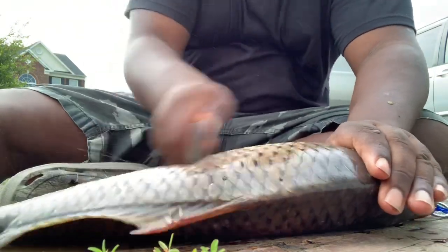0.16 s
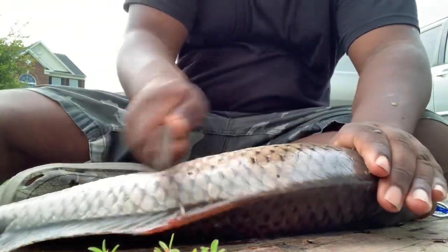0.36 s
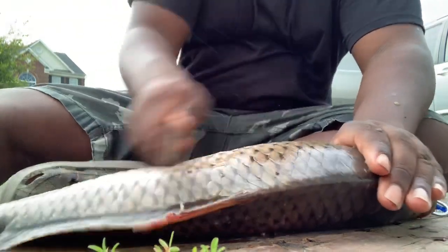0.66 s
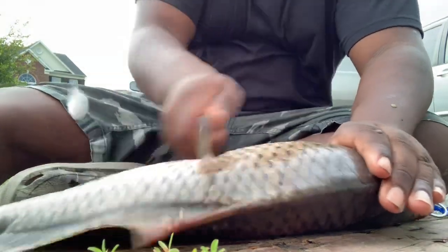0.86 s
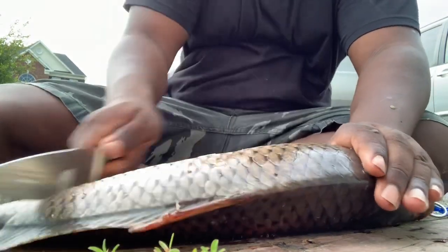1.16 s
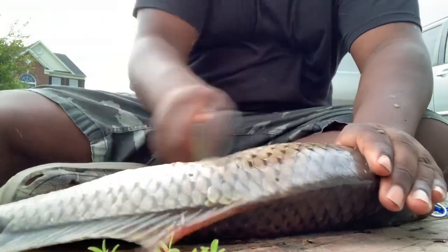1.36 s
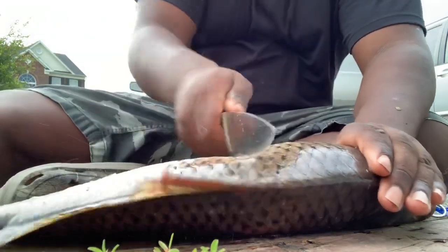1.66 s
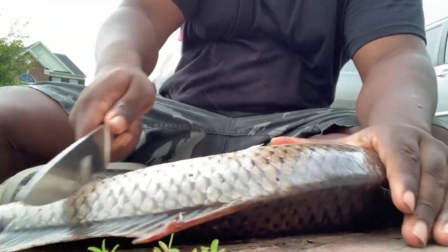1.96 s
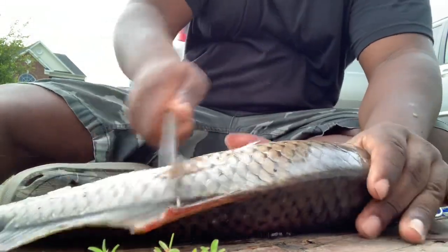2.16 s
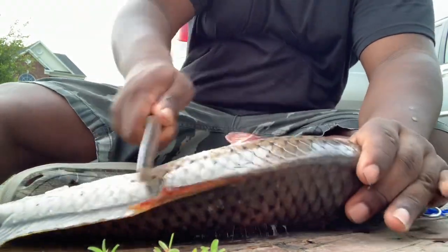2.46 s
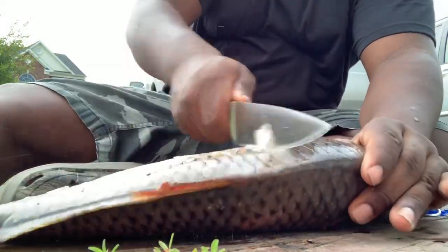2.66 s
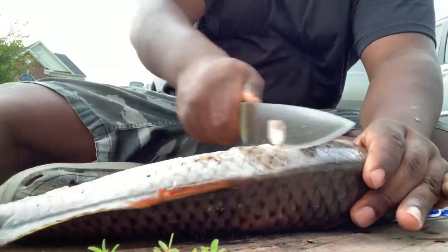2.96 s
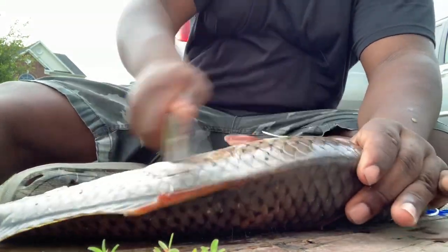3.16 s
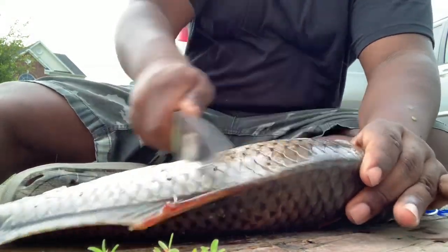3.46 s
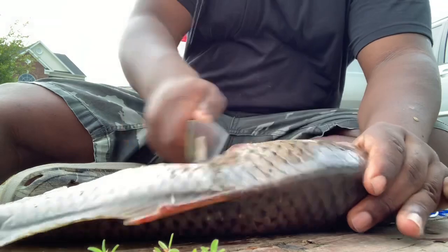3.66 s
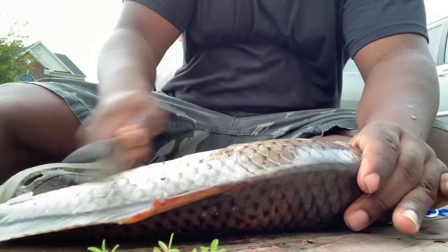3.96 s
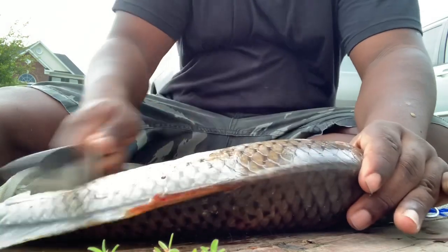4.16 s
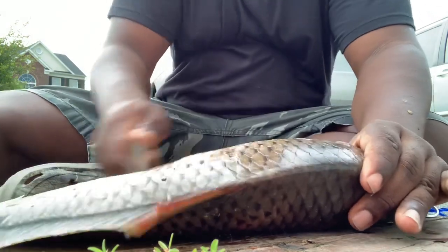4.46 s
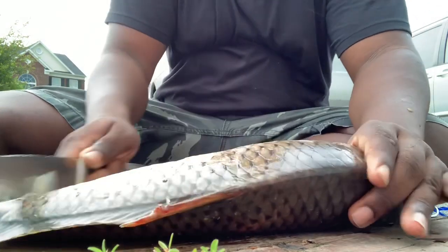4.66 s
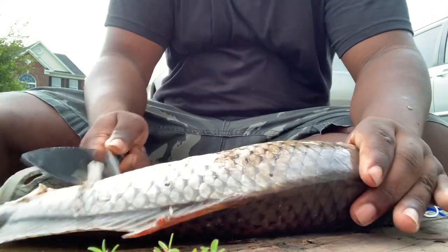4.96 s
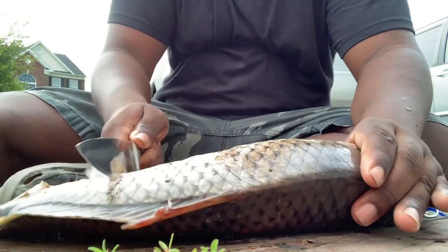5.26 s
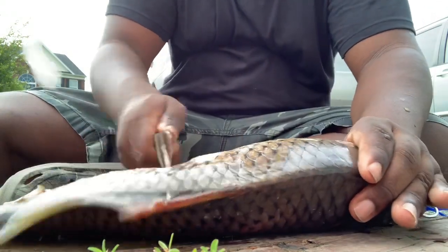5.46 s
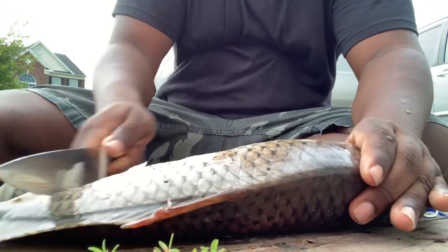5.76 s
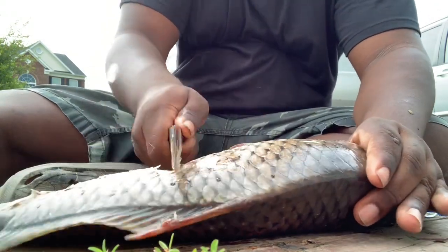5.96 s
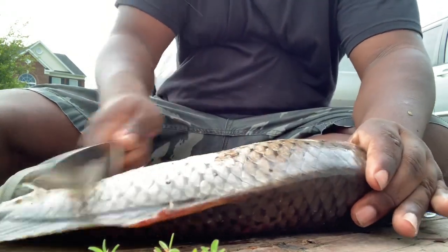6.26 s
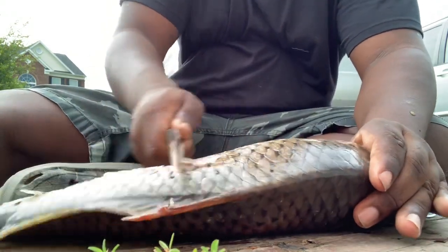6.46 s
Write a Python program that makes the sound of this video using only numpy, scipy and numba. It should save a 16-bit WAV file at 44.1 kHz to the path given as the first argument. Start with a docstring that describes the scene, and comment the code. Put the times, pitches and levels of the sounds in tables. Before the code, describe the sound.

Close to a phone on the ground outdoors, a kitchen knife scales a large fish on a board. A short smooth draw opens at 0 s, then from 0.15 s rough pushes alternate with hissing draws, about three pairs a second. The pushes are bright, gritty and tearing, with dry snaps as scales break loose, strongest around 0.55 to 1.7 s; the draws are smoother, with a hollow, slightly rising ring. Soft, damped low flops follow many pushes, rocking the board. The pattern continues until about 4.1 s, then thins to light scrapes, ticks of falling scales and weak thumps until 5.3 s. Firmer strokes return around 5.4 s, with two close flops near 6.4 s and a last draw at 6.55 s. A faint whine drifts in from 2 to nearly 5 s above low hum and distant traffic.

```python
"""Outdoors, a phone on the ground hears, close by, a kitchen knife scaling a large fish on a board.
A smooth draw opens; then pushes that catch and snap scales loose alternate with hissing draws, both made
of noise-like slips through filters. Soft flops, damped low tones, follow many pushes and rock the board.
A faint whine comes and goes from the second second to the fifth, as the strokes thin out; they then
return, with two last flops and a draw. A low hum and distant traffic lie under it all."""
import sys
import numpy as np
from scipy import signal
from scipy.fft import rfft, irfft
from scipy.io import wavfile
from scipy.ndimage import uniform_filter1d, map_coordinates
from numba import njit

SR = 44100
rng = np.random.default_rng(int(sys.argv[2]) if len(sys.argv) > 2 else 0)


def unload_wav(signal):
    """Save mono or channel-first audio to the path in sys.argv[1] as 16-bit WAV at rate SR, clipped to [-1, 1]."""
    wavfile.write(
        sys.argv[1],
        SR,
        np.round(np.clip(np.atleast_2d(signal).T, -1, 1) * 32767).astype(np.int16),
    )


N = 291942
TIME = np.arange(N) / SR

# Event levels are relative: each source adds its own layer gain.
# pushes against the scales: [start t/s, length t/s, fastest point/share of length, swell/dB,
# rasp level/dB, flesh scrape level/dB]
PUSHES = [(0.147, 0.12, 0.1, 12.5, -18, -31), (0.485, 0.12, 0.13, 26.5, -19.5, -31),
          (0.817, 0.085, 0.19, 14.5, -20, -28.5), (0.91, 0.054, 0.19, 6.5, -39, -37.5),
          (1.217, 0.1, 0.59, 7, -25.5, -36.5), (1.571, 0.14, 0.3, 16.5, -20, -26),
          (2.149, 0.17, 0.058, 25.5, -24, -28), (2.514, 0.1, 0.74, 7, -31, -38),
          (2.622, 0.034, 0.47, 18, -35, -50), (2.865, 0.086, 0.14, 11.5, -23.5, -37),
          (3.195, 0.14, 0.66, 15.5, -21.5, -32), (3.64, 0.16, 0.25, 22.5, -29.5, -36),
          (3.971, 0.11, 0.67, 15.5, -24, -35.5), (4.972, 0.034, 0.88, 10, -25.5, -40),
          (5.173, 0.13, 0.83, 9, -41, -50), (5.398, 0.078, 1, 12, -42, -51),
          (5.459, 0.054, 0.25, 19, -28.5, -35.5), (5.811, 0.06, 0.91, 11, -21.5, -33.5),
          (5.88, 0.094, 0.22, 19.5, -32, -31), (6.274, 0.11, 0.44, 18.5, -28.5, -30),
          (6.358, 0.083, 0.26, 7.5, -35.5, -38)]
# draws back along the scales: [start t/s, length t/s, fastest point/share of length, swell/dB,
# rasp level/dB, flesh scrape level/dB, hollow crackle level/dB]
DRAWS = [(0.001, 0.1, 1, 4, -36.5, -34.5, -39.5), (0.33, 0.12, 0.79, 9.5, -27, -32, -25.5),
         (0.642, 0.019, 0.55, 14, -24.5, -35, -35), (0.669, 0.1, 0.76, 7, -20.5, -30, -23.5),
         (1.016, 0.13, 0.59, 10, -21.5, -27.5, -19.5), (1.377, 0.079, 0.21, 18, -24, -34.5, -28.5),
         (1.448, 0.081, 0.46, 3, -27, -31, -33.5), (1.77, 0.14, 0.3, 5.5, -27, -29, -27.5),
         (1.968, 0.16, 0.055, 0, -45, -43, -51), (2.398, 0.083, 0.34, 11, -28, -31.5, -27),
         (2.729, 0.088, 0.2, 8, -31.5, -32.5, -36.5), (3.032, 0.12, 0.32, 16.5, -27.5, -28.5, -32.5),
         (3.378, 0.081, 0.46, 12.5, -22, -30.5, -34), (3.485, 0.036, 0.09, 1.5, -32, -30, -39.5),
         (3.549, 0.046, 0.12, 8, -34, -33, -33.5), (3.787, 0.14, 0.25, 19, -30.5, -33.5, -32),
         (4.109, 0.15, 0.65, 14.5, -29.5, -29.5, -31.5), (4.307, 0.119, 0.5, 3.5, -38, -38, -37.5),
         (4.461, 0.15, 1, 3, -42.5, -48, -45), (4.675, 0.069, 0.67, 17.5, -31, -32.5, -27.5),
         (4.781, 0.11, 0.71, 16, -55.5, -64, -47.5), (5.559, 0.1, 0.19, 3.5, -34.5, -35, -36.5),
         (5.679, 0.082, 0.65, 16, -34, -35, -42), (6.045, 0.13, 1, 1, -55, -63, -51.5),
         (6.123, 0.11, 0.35, -3.5, -38, -44, -39), (6.542, 0.097, 0.53, 30, -22, -33, -28.5)]
# the edge gets under a scale and peels it off: [start t/s, length t/s, rasp level/dB]
RIPS = [(0.231, 0.012, -24), (0.550, 0.0074, -23), (0.929, 0.011, -24), (1.579, 0.0061, -16.5),
        (1.686, 0.0096, -16.5), (2.16, 0.067, -36), (2.936, 0.015, -22), (3.248, 0.013, -26),
        (5.461, 0.018, -25.5), (5.813, 0.011, -27), (5.902, 0.013, -16), (6.213, 0.012, -21.5),
        (6.285, 0.033, -22.5), (6.379, 0.011, -19)]
# the edge sizzles over a row of rims on the way back: [start t/s, length t/s, rasp level/dB]
SKIMS = [(0.347, 0.013, -27), (1.453, 0.0095, -21), (1.832, 0.031, -21), (2.745, 0.032, -22),
         (3.048, 0.036, -20), (4.197, 0.018, -24), (6.152, 0.018, -24.5), (6.185, 0.0045, -29)]
# scales snapping loose: [t/s, crack level/dB, knock level in the flesh/dB, crack decay t/s]
SNAPS = [(0.1675, -37, -56, 0.00083), (0.191, -28, -23, 0.0018), (0.2289, -13, -23, 0.0043),
         (0.5575, -9.5, -27.5, 0.0035), (0.8655, -7.5, -36, 0.00067), (0.8801, -12, -44, 0.0008),
         (0.9291, -13, -18, 0.0014), (1.2175, -13.5, -48, 0.00071), (1.266, -12.5, -26, 0.0037),
         (1.295, -13, -26, 0.0053), (1.6057, -7, -24, 0.0011), (1.6332, -4.5, -33, 0.0018),
         (1.679, -14, -29, 0.00073), (1.689, -14, -30.5, 0.00069), (2.1503, -30, -39, 0.0008),
         (2.1647, -26, -35, 0.00083), (2.2, -32, -43, 0.00062), (2.22, -11.5, -32, 0.00085),
         (2.24, -24, -56, 0.0005), (2.277, -28, -22, 0.0018), (2.582, -20, -24, 0.001),
         (2.594, -13.5, -24.5, 0.0028), (2.642, -25, -48, 0.0005), (2.6456, -15, -26, 0.0029),
         (2.9, -9.5, -29, 0.0015), (2.945, -9.5, -25, 0.0038), (3.249, -8, -25, 0.0013),
         (3.2658, -10, -49, 0.00044), (3.2828, -9.5, -38, 0.0048), (3.2984, -8.5, -27, 0.00077),
         (3.3242, -30, -38, 0.0007), (3.6533, -32, -33, 0.0032), (3.686, -14.5, -29, 0.0016),
         (4.0174, -11.5, -31, 0.0014), (4.985, -35, -36, 0.0014), (5.27, -35, -52, 0.0006),
         (5.276, -45, -50, 0.00087), (5.4604, -20.5, -24, 0.0013), (5.816, -18, -46, 0.00078),
         (5.852, -30, -46, 0.00027), (5.857, -26, -49, 0.00031), (5.904, -24, -22, 0.0012),
         (5.913, -30, -26.5, 0.00088), (6.0911, -23.5, -58, 0.00043), (6.315, -30, -45, 0.0007),
         (6.324, -26, -26, 0.0012), (6.3806, -35, -23.5, 0.0012), (6.3856, -12, -40, 0.0015)]
# loose scales landing: [t/s, level/dB, middle of the noise band f/Hz]
TICKS = [(0.780, -30, 11000), (2.040, -30, 11000), (2.342, -42, 9000), (2.358, -47, 9100),
         (2.713, -40, 11000), (3.173, -45, 10000), (4.3296, -27.5, 11000), (4.3455, -41, 11000),
         (4.865, -44, 3550), (5.050, -39, 3140), (5.187, -35, 4500), (5.226, -48, 6000), (5.235, -50, 7000),
         (5.365, -46, 11000), (5.4423, -28.5, 5500), (5.511, -37, 2500), (5.788, -34, 6130),
         (6.489, -45, 10000), (6.521, -36.5, 12000)]
# the fish flopping on the board: [t/s, slap level/dB, slap f/Hz, deep thud level/dB]
FLOPS = [(0.282, -29, 285, -24.5), (0.597, -20.5, 151, -22.5), (0.975, -20.5, 173, -21),
         (1.041, -24.5, 180, -21), (1.075, -52, 143, -22.5), (1.331, -63, 166, -24.5),
         (1.703, -37, 164, -22.5), (2.319, -17.5, 167.6, -21), (2.686, -33.5, 275, -26.5),
         (2.989, -33, 279, -24), (5.056, -75, 177, -28), (5.117, -35.5, 139, -38), (5.514, -25.5, 143, -25),
         (5.538, -22.5, 147, -26.5), (5.947, -22, 257, -20.5), (5.978, -23.5, 161.5, -24),
         (6.417, -16, 159, -18.5), (6.458, -19.5, 256.6, -19.5)]
# a far-off whine that comes and goes: [t/s, level/dB]
WHINE_LEVEL = [(1.2, -78), (2.3, -59.5), (3.8, -65), (4.4, -57.5), (4.9, -87)]

# relative spectra of the rasp, flesh scrape, scale crackle, tearing crack, wet knock, rocking board
# and open air: [f/Hz, level per Hz/dB]
PUSH_RASP = [(2000, -93.5), (4300, -7), (6500, -8.5), (8000, -4.5), (11000, -1), (13500, 1.5), (16000, -2)]
DRAW_RASP = [(2000, -62), (4300, -13), (6500, -9), (8000, -3), (11000, 1.5), (13500, 2.5), (16000, -2.5)]
PUSH_FLESH = [(150, -28), (380, -9), (800, -3.5), (1200, -7.5), (1700, -23), (2500, -3), (5000, -33.5)]
DRAW_FLESH = [(200, -20), (550, -5), (880, -5.5), (1200, -9.5), (1650, -11.5), (2300, -8), (5000, -16)]
CRACKLE = [(900, -20.5), (1900, 0.5), (2750, -5.5), (4300, 1), (5600, -2.5), (7000, -2), (10000, -4),
           (16000, -53.5)]
CRACK = [(800, 7), (2200, -21), (5000, 5.5), (9000, 16.5), (13000, 22.5), (16000, 10)]
KNOCK = [(120, -13), (350, -1), (700, -64.5), (1100, -19), (1800, -3), (4000, -1.5), (9000, -2)]
BOARD_RUMBLE = [(15, -16.5), (25, -17), (37, 8), (48, 1), (63, 4), (85, -3), (130, -12.5), (290, -18),
                (400, -21.5), (1200, -56)]
OUTDOORS = [(20, 2), (55, 4), (110, -1), (180, -2.5), (300, -14.5), (500, -13.5), (1000, -18.5),
            (2000, -26.5), (5000, -35), (16000, -49)]

# ringing of the steel blade: [f/Hz, width f/Hz, level over the rasp/dB]
BLADE = [(2400, 300, 3), (2850, 250, 3), (4150, 400, 2), (5600, 600, 2), (7750, 400, 3), (9250, 400, 3),
         (10650, 500, 5), (12100, 400, 5), (13650, 550, 4), (14500, 450, -4), (15200, 700, 4)]
# hollow colour of the blade lying flat on the scales: [f/Hz, width f/Hz, lift or cut level/dB]
HOLLOW = [(2150, 400, -11), (2420, 120, 5), (2870, 130, 10), (3080, 150, -5), (3300, 130, 7),
          (5050, 300, -4), (5500, 400, 5), (6400, 700, -4)]
# hollow ring of the board under the fish: [f/Hz, width f/Hz, level over the scrape/dB]
BOARD_RING = [(285.1, 100, 21.5)]
# ring of the flesh under a snapping scale, before detuning: [f/Hz, level/dB, decay t/s]
KNOCK_MODES = [(377, -2, 0.0039), (563, 4, 0.0015), (863, 2, 0.0036), (1273, -2, 0.0031),
               (2110, -4, 0.0027)]
# resting pitches of resonances that the travelling contact brings out or damps: [f/Hz]
SLIDING_HZ = [1800, 2420, 2870, 3300, 3750, 4100, 4400, 4700, 5250, 5520, 5800, 6200, 7000, 7700, 8250,
              8800, 9250, 10550, 10800, 11100, 12100, 12700, 13200, 13650, 15100]

# the right port hears the board's midrange more strongly than the left: [f/Hz, level/dB]
RIGHT_PORT = [(300, 0), (600, 3), (1100, 5), (1700, 4), (2400, 0), (4300, .5), (5400, 2.5), (6500, 0),
              (16000, 0)]
# how far the right port lags the left: [f/Hz, phase/rad]
PORT_LAG = [(0, 0), (1380, 0.1), (2150, 3.3), (4400, 7.8), (7200, 16.2), (16700, 40.6)]
# share of the sound whose phase wanders between the two ports: [f/Hz, share/0-1]
WANDERING = [(350, 0), (600, .7), (2400, .65), (2900, .95), (6900, .95), (7800, .3), (16000, .3)]

HUM_HZ, HUM_DB = 180.2, -51.5  # means of a wavering tone
WHINE_HZ = 1870
TOP_HZ = 15750
# the board rocks around each flop and follows the work of the arm
ROCK_RISE_S, ROCK_DECAY_S, ARM_LAG_S, ARM_SWAY_S = 0.041, 0.092, 0.1, 0.061
# a faint rub of wet steel lingers on both sides of a stroke
LINGER_DB, LINGER_S = -29, 0.05


def pushes(rasp_db=1.0, crackle_db=-5.0, flesh_db=-2.5):
    """Against the scales: the edge catches hard on the rims."""
    rasp_gain, flesh_gain = stroke_gains(PUSHES, attack_s=0.0044, release_s=0.011, press_db=10.0)
    rasp_gain = np.hypot(rasp_gain, rip_gain(RIPS, attack_s=0.0022, release_s=0.0014))
    grip = catches(rate=520, spread_db=6, width_s=.0003, slide=.7)
    rasp = unit(colour(grip * ridges(7000, spread_db=4), PUSH_RASP, BLADE))
    crackle = unit(colour(grip * ridges(1100, spread_db=4.5), CRACKLE))
    flesh = unit(colour(grip * ridges(1800, spread_db=2), PUSH_FLESH, BOARD_RING))
    # scales crackle most when the blade is both fast and pressed in
    crackle_gain = np.sqrt(rasp_gain * flesh_gain)
    blade = undb(rasp_db) * rasp_gain * rasp + undb(crackle_db) * crackle_gain * crackle
    stroke = blade + undb(flesh_db) * flesh_gain * flesh
    rise = .035 * travel(PUSHES)
    return sliding(stroke, rise, depth_db=7, width_hz=220, drift=.03, rate=22)


def draws(rasp_db=2.5, crackle_db=-8, flesh_db=-8.0, pocket_hz=1170, pocket_db=8):
    """With the scales: the edge glides with a hollow, rising ring, and the rims only flutter the hiss."""
    rasp_gain, flesh_gain, crackle_gain = stroke_gains(
        DRAWS, attack_s=0.0018, release_s=0.0085, press_db=2.5)
    rasp_gain = np.hypot(rasp_gain, rip_gain(SKIMS, attack_s=0.0024, release_s=0.0018))
    grip = catches(rate=520, spread_db=5, width_s=.0005, slide=1.0)
    rasp = unit(colour(grip * ridges(16000, spread_db=6), DRAW_RASP, BLADE))
    crackle = unit(colour(grip * ridges(1800, spread_db=4), CRACKLE, HOLLOW))
    flesh = unit(colour(grip * ridges(2000, spread_db=2), DRAW_FLESH, BOARD_RING))
    # the pocket of air under the blade closes along the stroke, so its note rises and strengthens
    place = travel(DRAWS)
    note_hz = pocket_hz * np.exp(.2 * place)
    flesh = bell(flesh, note_hz, 190., undb(pocket_db * (1 + place)), 16)
    blade = undb(rasp_db) * rasp_gain * rasp + undb(crackle_db) * crackle_gain * crackle
    stroke = blade + undb(flesh_db) * flesh_gain * flesh
    return sliding(stroke, rise=.035 * place, depth_db=16, width_hz=140, drift=.01, rate=15)


def snaps(crack_db=2, knock_db=0, smack=1.0, detune=0.15, pop=3):
    """A scale tears out with a short crack and jolts the flesh, which rings a little differently each time."""
    cracks, knocks = np.zeros((2, N))
    lead_s = .003  # room for the onset before the snap
    t = TIME[:SR // 20] - lead_s
    after = np.maximum(t, 0)
    rise = np.exp(np.minimum(t, 0) / .00015)
    tail = undb(-27) * np.exp(-after / .005)
    for s, tear_db, jolt_db, decay_s in SNAPS:
        tear, squelch = rng.standard_normal((2, len(t)))
        tear[int(lead_s * SR) + 1] = pop  # the root gives way at once
        fade = np.exp(-after / max(decay_s, 1 / SR)) + tail
        add(cracks, s - lead_s, undb(tear_db) * tear * rise * fade)
        ring = np.zeros(len(t))
        for k, (hz, db, ring_s) in enumerate(KNOCK_MODES):
            mode_hz = hz * np.exp(detune * rng.standard_normal())
            mode = undb(db) * np.sin(2 * np.pi * mode_hz * after) * np.exp(-after / ring_s)
            ring += mode * (-1) ** k  # neighbouring modes start in opposite directions
        wet = smack * colour(squelch, KNOCK) * rise * np.exp(-after / 0.0079)
        add(knocks, s - lead_s, undb(jolt_db) * (ring + wet))
    return undb(crack_db) * colour(cracks, CRACK, BLADE), undb(knock_db) * knocks


def loose_scales(rate=12, level_db=-40, spread_db=5, decay_s=0.0012):
    """Loose scales tick as they land, in noise bursts, and as they peel off the wet blade, in random clicks."""
    out = undb(level_db) * colour(clicks(rate, spread_db), CRACK)
    t = TIME[:SR // 30]
    for s, db, hz in TICKS:
        edges_hz = [hz / 2, min(hz * 1.5, SR * .45)]
        band = signal.butter(2, edges_hz, "band", fs=SR, output="sos")
        burst = rng.standard_normal(len(t)) * np.exp(-t / decay_s)
        add(out, s, undb(db) * signal.sosfilt(band, burst) * 2)
    return out


def flops(rise_s=0.0047, slap_s=0.015, ring_s=0.021, ring_db=-9, thud_hz=62, thud_s=0.013,
          slap_gain_db=4, thud_gain_db=3):
    """The soft body lands on the board: a damped slap, the ring of the board and a deep thud."""
    out = np.zeros(N)
    t = TIME[:SR // 4]
    soft_onset = 1 - np.exp(-(t / rise_s) ** 2)
    skin = signal.butter(4, [140, 320], "band", fs=SR, output="sos")
    board_hz = BOARD_RING[0][0]
    for s, slap_db, hz, thud_db in FLOPS:
        # wet skin meets the wood unevenly
        patter = unit(signal.sosfilt(skin, rng.standard_normal(len(t))))
        slap = (np.sin(2 * np.pi * hz * t) + 0.24 * patter) * np.exp(-t / slap_s)
        ring = undb(ring_db) * np.sin(2 * np.pi * board_hz * t) * np.exp(-t / ring_s)
        thud = undb(thud_db + thud_gain_db) * np.sin(2 * np.pi * thud_hz * t) * np.exp(-t / thud_s)
        landing = undb(slap_db + slap_gain_db) * (slap + ring) + thud
        add(out, s - rise_s / 2, landing * soft_onset)
    return out


def rocking(flop_db=-5, arm_db=-12, rest_db=-50, side_db=-10):
    """The board rumbles as the weight on it shifts: it swells around each flop and sways with the strokes."""
    power = np.full(N, undb(rest_db) ** 2)
    for s, _, _, thud_db in FLOPS:
        since = TIME - s
        settling = np.exp(-np.maximum(since / ROCK_DECAY_S, -since / ROCK_RISE_S))
        power = np.maximum(power, (undb(thud_db + flop_db) * settling) ** 2)
    for start, _, _, _, rasp_db, *_ in [*PUSHES, *DRAWS]:
        sway = np.exp(-np.abs(TIME - start - ARM_LAG_S) / ARM_SWAY_S)
        power = power + (undb(rasp_db + arm_db) * sway) ** 2
    mid, side = (colour(rng.standard_normal(N), BOARD_RUMBLE) for _ in range(2))
    return np.sqrt(power) * (mid + undb(side_db) * side * np.array([[1], [-1]]))


def outdoors(level_db=-49.0, side_db=-9, waver_db=2):
    """Distant traffic as slowly swelling noise, and a machine hum that wavers in pitch and level."""
    swell_db, swells_per_s = 1, 2.5
    mid, side = (colour(rng.standard_normal(N), OUTDOORS) * undb(swell_db * walk(swells_per_s))
                 for _ in range(2))
    phase = 2 * np.pi * np.cumsum(HUM_HZ + 2 * walk(16)) / SR
    hum = np.sin(phase) * undb(HUM_DB + waver_db * walk(8.9))
    return undb(level_db) * (mid + undb(side_db) * side * np.array([[1], [-1]])) + hum


def whine(width_hz=130):
    """A faint, breathy whine, perhaps a machine some way off: a narrow band of noise."""
    edges_hz = [WHINE_HZ - width_hz / 2, WHINE_HZ + width_hz / 2]
    band = signal.butter(1, edges_hz, "band", fs=SR, output="sos")
    breath = unit(signal.sosfilt(band, rng.standard_normal((2, N))))
    return undb(np.interp(TIME, *np.transpose(WHINE_LEVEL))) * breath


def stroke_gains(strokes, attack_s, release_s, press_db):
    """One gain for each layer of a stroke: the edge lands, speeds up, slows and lifts as pressure grows."""
    power = np.zeros((len(strokes[0][4:]), N))
    for start, length, fastest, swell_db, rasp_db, *pressed_db in strokes:
        near = np.abs(TIME - start - length / 2) < length / 2 + 5 * LINGER_S
        t = TIME[near] - start
        along = np.clip(t / length, 0, 1)
        peak = np.clip(fastest, .02, .98)
        speed = undb(np.interp(along, [0, peak, 1], [-swell_db, 0, -swell_db]))
        rub = undb(LINGER_DB) * contact(t, length, LINGER_S, LINGER_S)
        touch = np.maximum(contact(t, length, attack_s, release_s), rub)
        pressure = undb(np.add.outer(pressed_db, press_db * (along - .5)))
        power[0, near] += (undb(rasp_db) * touch * speed) ** 2
        power[1:, near] += (pressure * touch * speed) ** 2
    return np.sqrt(power)


def rip_gain(rips, attack_s, release_s):
    """The rasp surges for as long as the edge works at the rims."""
    gain = np.zeros(N)
    lead_s = .01  # room for the attack
    t = TIME[:SR // 8] - lead_s
    for start, length, rasp_db in rips:
        add(gain, start - lead_s, undb(rasp_db) * contact(t, length, attack_s, release_s))
    return gain


def contact(t, length, attack_s, release_s):
    """Envelope that rises up to time 0, holds for its length and dies away."""
    return np.exp(np.minimum(t, 0) / attack_s - np.maximum(t - length, 0) / release_s)


def catches(rate, spread_db, width_s, slide):
    """Grip of the edge: it builds at each scale rim and lets go, over a steady sliding share."""
    t = np.arange(-SR // 100, SR // 100) / SR
    grip = signal.fftconvolve(clicks(rate, spread_db), np.exp(-np.abs(t) / width_s), "same")
    grip = unit(grip) + slide
    # the hand keeps the mean force even from one row of scales to the next
    return grip / np.sqrt(uniform_filter1d(grip ** 2, size=700))


def ridges(rate, spread_db):
    """Tiny slips of the edge over the fine ridges of a scale, as clicks of random sign."""
    return unit(clicks(rate, spread_db) * np.sign(rng.standard_normal(N)))


def travel(strokes, size=16):
    """Place of the edge, from -.5 to .5 along each stroke, smoothed, once every size samples."""
    t = TIME[::size]
    place = np.zeros(len(t))
    for start, length, *_ in strokes:
        place = np.where(t > start, np.minimum((t - start) / length, 1) - .5, place)
    return uniform_filter1d(place, size=40)


def sliding(x, rise, depth_db, width_hz, drift, rate, size=16):
    """The contact slides along the edge: each resonance rises and drifts in pitch, swells and is damped."""
    t = TIME[::size]
    knots = np.arange(int(rate * N / SR) + 2) / rate
    for hz in SLIDING_HZ:
        bend, swell = rng.standard_normal((2, len(knots)))
        when = knots - rng.random() / rate
        gain = undb(np.interp(t, when, depth_db * (np.tanh(1.5 * swell) - .15)))
        centre = hz * np.exp(rise + drift * np.interp(t, when, bend))
        x = bell(x, centre, float(width_hz), gain, size)
    return x


@njit
def bell(x, hz, width, gain, size):
    """Boost or cut around a moving centre; centre and linear gain come once every size samples."""
    y, band, low = np.empty(len(x)), 0., 0.
    for j in range(len(hz)):
        g = np.tan(np.pi * hz[j] / SR)
        damping = width / hz[j] / np.sqrt(gain[j])
        scale = 1 / (1 + g * (g + damping))
        for i in range(j * size, min((j + 1) * size, len(x))):
            # the tiny offset keeps the filter state from fading into very slow arithmetic
            v = (band + g * (x[i] + 1e-18 - low)) * scale
            band, low = 2 * v - band, low + 2 * g * v
            y[i] = x[i] + (gain[j] - 1) * damping * v
    return y


def thrown_back(x):
    """The board and the legs throw the rasp back."""
    return bounce(bounce(x, delay_s=.00067, gain=.28), delay_s=.0018, gain=.22)


def bounce(x, delay_s, gain):
    """A reflection off a near surface; its path wanders around delay_s as the knife travels."""
    late = delay_s * SR * np.exp(.2 * walk(6))
    echo = map_coordinates(x, [np.arange(N) - late], order=3)
    return (x + gain * echo) / np.sqrt(1 + gain ** 2)


def ports(x, uneven, rate, turns_per_s=350, twist=0):
    """The right port lags the left; part of the sound wanders in phase there, and the level leans at random."""
    f = np.arange(N // 2 + 1) * SR / N
    gain = undb(np.interp(f, *np.transpose(RIGHT_PORT)))
    lag = np.interp(f, *np.transpose(PORT_LAG))
    share = np.interp(f, *np.transpose(WANDERING))
    lean = uneven * walk(min(rate, SR / 20))
    turn = 2 * walk(turns_per_s)  # radians
    late = rfft(x * (1 - lean)) * gain * np.exp(-1j * lag)
    # with twist (radians), each stretch of the spectrum gets its own random phase at the right port
    centres = np.arange(0, SR / 2, 230)
    phase = twist * np.interp(f, centres, rng.standard_normal(len(centres)))
    wandering = late * share * np.exp(1j * phase)
    steady = irfft(late * np.sqrt(1 - share ** 2), N)
    right = steady + np.cos(turn) * irfft(wandering, N) + np.sin(turn) * irfft(1j * wandering, N)
    left = x * (1 + lean)
    return np.array([port + scatter(port) for port in (left, right)])


def scatter(x):
    """Faint, brief reflections from the board, the ground and the legs, as decaying noise."""
    t = TIME[:SR // 10]
    response = rng.standard_normal(len(t)) * np.exp(-t / .009) * (t > .001)
    return undb(-20) * signal.fftconvolve(x, response / np.linalg.norm(response))[:N]


def colour(x, points, resonances=(), size=4096):
    """Causal filter of unit power gain from (Hz, dB) points and resonance humps."""
    f = np.arange(size // 2 + 1) * SR / size
    hz, db = np.transpose(points)
    shape = np.interp(np.log(f + 1), np.log(hz), db)
    for centre, width, lift in resonances:
        shape = shape + lift / (1 + (2 * (f - centre) / width) ** 2)
    # folding the cepstrum gives minimum phase
    cepstrum = irfft(np.log(undb(shape)))
    cepstrum[1:size // 2] *= 2
    cepstrum[size // 2 + 1:] = 0
    response = irfft(np.exp(rfft(cepstrum)))
    return signal.fftconvolve(x, response / np.linalg.norm(response))[:len(x)]


def clicks(rate, spread_db):
    """Random clicks, rate a second on average, of uneven size."""
    size = undb(spread_db * np.clip(rng.standard_normal(N), -2, 2))
    return (rng.random(N) < rate / SR) * size


def walk(rate):
    """Random drift of rms 1, through rate fresh points a second."""
    return unit(np.interp(TIME * rate, np.arange(N // 10), rng.standard_normal(N // 10)))


def add(track, s, sound):
    """Mix a short sound into a track at time s."""
    i = max(int(s * SR), 0)
    track[i:i + len(sound)] += sound[:max(N - i, 0)]


def unit(x):
    """Scale to rms 1."""
    return x / np.sqrt(np.mean(x ** 2) + 1e-20)


def undb(db):
    """Decibels to gain."""
    return 10 ** (np.asarray(db) / 20)


def scene():
    """Blade, flesh and board close in front of the phone's two ports, in the open air."""
    cracks, knocks = snaps()
    against = thrown_back(pushes() + cracks + loose_scales()) + knocks
    catching = ports(against, uneven=.1, rate=1500)
    gliding = ports(thrown_back(draws()), uneven=.1, rate=1500, turns_per_s=22, twist=1.8)
    board = ports(flops(), uneven=.32, rate=120)
    return catching + gliding + board + rocking() + outdoors() + whine()


def record(dry):
    """The phone rounds the loudest peaks and cuts the top."""
    rounded = .8 * np.tanh(dry / .8)
    low_pass = signal.ellip(10, .2, 70, TOP_HZ, fs=SR, output="sos")
    return signal.sosfilt(low_pass, rounded)


dry = scene()
out = record(dry)
unload_wav(out)
```